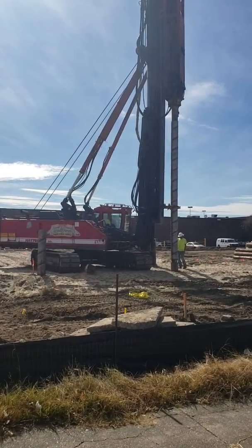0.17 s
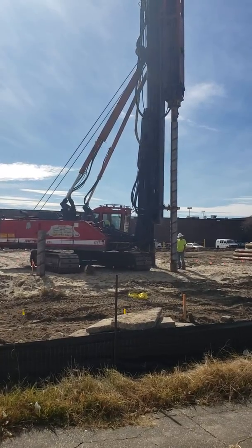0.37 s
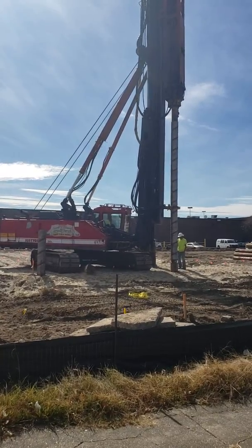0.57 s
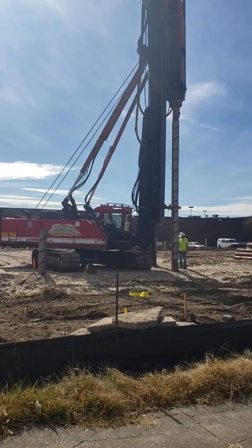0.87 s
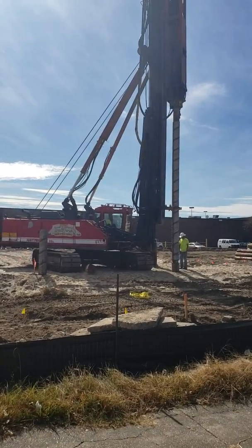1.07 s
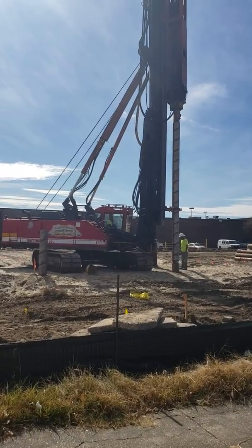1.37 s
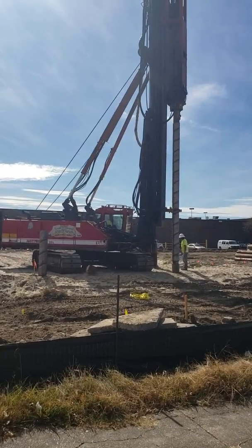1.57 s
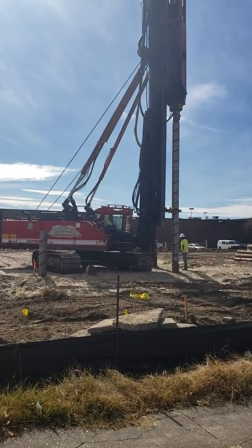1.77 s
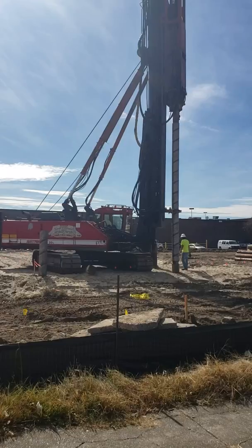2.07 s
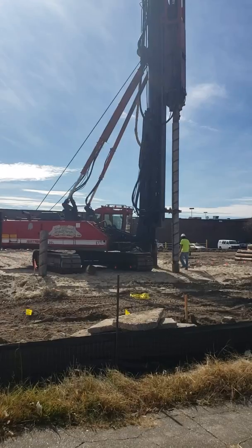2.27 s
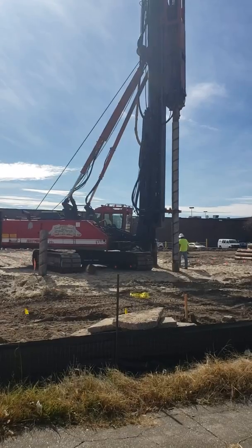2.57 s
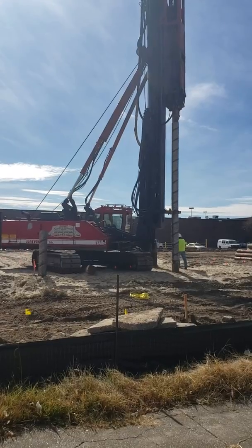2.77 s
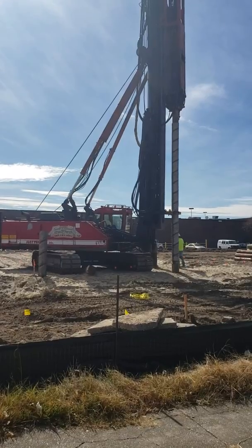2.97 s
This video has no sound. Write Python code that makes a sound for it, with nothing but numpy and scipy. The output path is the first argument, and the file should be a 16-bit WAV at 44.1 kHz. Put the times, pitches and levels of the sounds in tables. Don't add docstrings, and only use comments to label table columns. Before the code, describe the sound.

Steady low engine drone of a drilling rig, with metallic scraping and one clank.

```python
import sys
import numpy as np
from scipy import signal
from scipy.io import wavfile

SR = 44100
rng = np.random.default_rng(int(sys.argv[2]) if len(sys.argv) > 2 else 0)


def digitize_waveform(pressure):
    field = np.atleast_2d(pressure).T
    bounded = np.clip(field, -1, 1)
    quanta = np.round(bounded * 32767).astype(np.int16)
    wavfile.write(sys.argv[1], SR, quanta)


def invert_db(x):
    u = np.asarray(x, float) / 20
    return 10 ** u


N = 138033


def rms_one(x):
    return x / np.sqrt(np.mean(x ** 2) + 1e-20)


def in_time(rows):
    s, *columns = np.transpose(rows)
    return [np.interp(np.arange(N) / SR, s, c) for c in columns]


def at_hz(points, hz):
    points_hz, values = np.transpose(points)
    return np.interp(np.log(hz), np.log(points_hz), values)


def drift(rate_hz):
    r = np.exp(-80 * np.pi * rate_hz / SR)
    slow = signal.lfilter([1], [1, -2 * r, r * r], rng.standard_normal(N // 40 + 2002))
    slow = slow[2000:]
    return np.interp(np.arange(N) / 40, np.arange(len(slow)), rms_one(slow))


def resonate(x, hz, width_hz):
    r = np.exp(-np.pi * width_hz / SR)
    poles = [1, -2 * r * np.cos(2 * np.pi * hz / SR), r * r]
    return signal.lfilter([1, 0, -1], poles, x + 1e-18) * (1 - r * r) / 2


def resonate_twice(x, hz, width_hz):
    return resonate(resonate(x, hz, width_hz), hz, width_hz)


def low_pass(x, order, hz):
    return signal.sosfilt(signal.butter(order, hz, fs=SR, output="sos"), x)


def band_pass(x, low_hz, high_hz):
    return signal.sosfilt(signal.butter(2, [low_hz, high_hz], "band", fs=SR, output="sos"), x)


def spread(pair, hz):
    # pitch_hz, correlation
    likeness = [(60, 1), (400, 0.95), (600, 0.74), (1300, 0.59), (2200, 0.65), (2900, -0.054), (4200, 0.35),
                (15000, -0.025)]
    # pitch_hz, left_minus_right_db
    lean = [(60, -5), (130, 7.5), (290, -3.5), (640, 5), (1410, -3), (2400, 1), (4200, -4), (8000, 2),
            (15000, -5)]
    # pitch_hz, phase_rad
    port_phase = [(0, 0), (950, -0.15), (1460, 0.65), (2410, 0.41), (3400, -0.5), (4820, 0.017),
                  (5770, -0.87), (15300, -0.52)]
    alike = np.clip(at_hz(likeness, hz), -.9, .999)
    sides = np.array([[1], [-1]])
    half = np.interp(hz, *np.transpose(port_phase)) / 2
    ahead = np.gradient(pair[0]) / np.sin(2 * np.pi * hz / SR)
    direct = np.cos(half) * pair[0] + np.sin(half) * ahead * sides
    ports = np.sqrt(1 + alike) * direct + np.sqrt(1 - alike) * pair[1] * sides
    return invert_db(at_hz(lean, hz) / 2 * sides) * ports / np.sqrt(2)


def banded(spectrum, low_hz, count, white, patchy_db):
    out, together = 0, drift(2.0)
    edges = low_hz * 2 ** (np.arange(count + 1) / 3)
    for k, (low, high) in enumerate(zip(edges, edges[1:])):
        pair = band_pass(white[k % 2], low, high)
        hz = np.sqrt(low * high)
        flicker_db = patchy_db * (0.2 * together + drift(5.6))
        out = out + invert_db(at_hz(spectrum, hz) + flicker_db) * spread(pair, hz)
    return rms_one(out)


def wind():
    # peak_s, level_db
    gusts = [(.1, -36), (.42, -54), (.555, -26), (.68, -30), (.78, -31), (.88, -37), (.95, -28),
             (1.12, -43.5), (1.33, -56), (1.535, -28), (1.65, -29), (2.0, -26.5), (2.37, -42), (2.65, -34),
             (2.82, -32), (2.98, -37), (3.11, -34)]
    wind_db, gust_db, gust_s = -40.5, 2.5, .018
    t = np.arange(N) / SR
    high_pass = signal.butter(3, 47, "high", fs=SR, output="sos")
    low = signal.sosfilt(high_pass, rng.standard_normal((2, N)))
    low = low_pass(low, 2, 71.5)
    puffs = sum(invert_db(db) * np.exp(-((t - s) / gust_s) ** 2) for s, db in gusts)
    breeze = invert_db(wind_db + gust_db * np.array([drift(10.0), drift(13.0)]))
    return (breeze + puffs) * rms_one(low) * invert_db(np.array([[1.5], [-1.5]]))


def air_bleed():
    # time_s, level_db, whistle_hz
    bleed = [(0, -59.5, 6170), (.4, -69.5, 6570), (.85, -62.5, 7600), (.95, -65, 7600), (1.3, -84, 7600),
             (3.13, -86, 7600)]
    width_hz, top_hz, top_width_hz, top_db, fizz_db = 1100, 12000, 840, -9.5, -11.5
    db, hz = in_time(bleed)
    base = low_pass(rng.standard_normal((2, 2, N)), 2, width_hz / 2)
    angle = 2 * np.pi * np.cumsum(hz) / SR
    whistle = rms_one(base[0] * np.cos(angle) + base[1] * np.sin(angle))
    top = rms_one(resonate_twice(rng.standard_normal((2, N)), top_hz, top_width_hz))
    fizz = rms_one(np.diff(rng.standard_normal((2, N + 4)), 4))
    return invert_db(db) * (whistle + invert_db(top_db) * top + invert_db(fizz_db) * fizz)


def roar(turns):
    # pitch_hz, level_db_per_hz
    rumble_spectrum = [(20, -28.5), (42, -11.5), (75, 1.5), (125, -2.5), (180, -6), (270, -9.5),
                       (400, -10.5), (540, -28)]
    # pitch_hz, level_db_per_hz
    casing_spectrum = [(280, -37), (480, -7), (509, -16), (711, 0.5), (1080, -3.5), (2030, -17),
                       (2560, -24.5), (3330, -14.5), (15600, -41.5)]
    # time_s, rumble_db, casing_db, treble_db
    load = [(0, -1, -0.5, -0.5), (.4, -4, -0.5, 1), (.8, -2, 1, 2), (1.05, -2, 1, -0.5),
            (1.4, -1.5, 1, -3.5), (1.6, 0.5, 1, -0.5), (1.9, -3, 0, -3), (2.3, 0.5, 2.5, 0.5),
            (2.55, 1, 1.5, -1), (2.85, 2, 1.5, 1), (3.13, 1.5, 3, 1.5)]
    # pitch_hz, width_hz, level_db
    casing = [(702, 120, -56), (1254, 308, -52.5), (2040, 367, -55), (3930, 880, -60.5), (7600, 400, -68.5)]
    low_db, high_db, treble_from_hz, firing_gate = -32, -41, 2900, .1
    rumble_db, casing_db, treble_db = in_time(load)
    low_white = rng.standard_normal((2, 2, N))
    low = invert_db(low_db) * banded(rumble_spectrum, 20.48, 14, low_white, patchy_db=-0.8)
    white = rng.standard_normal((2, 2, N))
    high = invert_db(high_db) * banded(casing_spectrum, 499.4, 15, white, patchy_db=0.87)
    for hz, width_hz, db in casing:
        ring = rms_one(resonate_twice(white[0], hz, width_hz))
        high = high + invert_db(db + 1.1 * drift(10.0)) * spread(ring, hz) * np.sqrt(2)
    dull = signal.sosfiltfilt(signal.butter(2, treble_from_hz, fs=SR, output="sos"), high)
    treble = (high - dull) * (1 + firing_gate * np.cos(2 * np.pi * turns))
    return invert_db(rumble_db) * low + invert_db(casing_db) * dull + invert_db(treble_db) * treble


def groans():
    # start_s, length_s, pitch_hz, level_db
    moans = [
        (.435, .05, 735, -43),
        (.50, .11, 612, -40),
        (.695, .05, 615, -43),
        (.70, .05, 780, -46),
        (.65, .09, 1960, -52),
        (.74, .07, 1900, -54),
    ]
    sag = .3
    t, out = np.arange(N) / SR, 0
    for s, length, hz, db in moans:
        u = np.clip((t - s) / length, 0, 1)
        pitch = hz * (1 + sag * (u - .45) ** 2)
        swell = np.sin(np.pi * u) ** .6
        out = out + invert_db(db + 3) * swell * np.sin(2 * np.pi * np.cumsum(pitch) / SR)
    return out * invert_db(np.array([[2.5], [-2.5]]))


def clank():
    # time_s, peak_db
    strikes = [
        (1.5172, -30),
        (1.561, -30),
    ]
    # pitch_hz, blow_db, echo_db, t60_s
    modes = [(600, -6, -16, .14), (868, -14, -2, .25), (945, 2, -14, .07), (1110, -6, -12, .03),
             (1815, -20, -15, .25), (2050, -17, -20, .1), (2290, -18, -20, .12), (2510, -5, -22, .05),
             (2720, -17, -24, .1), (3450, -8, -40, .025), (3900, -15, -40, .012), (4650, -9, -40, .03),
             (4900, -13, -40, .018)]
    contact_hz, tick_s, tick_db = 5600, 3.042, -53
    crack_db, crack_s, tail_db, tail_s, crack_top_hz = -34, .002, -31.5, .055, 2800
    out, t = np.zeros((2, N)), np.arange(N) / SR
    for hz, *strikes_db, t60 in modes:
        clicks = np.zeros((2, N))
        for (s, peak_db), db in zip(strikes, strikes_db):
            uneven_db = 2 * rng.standard_normal() * np.array([1, -1])
            clicks[:, int(s * SR)] = invert_db(peak_db + db + uneven_db)
        r, w = invert_db(-60 / (t60 * SR)), 2 * np.pi * hz / SR
        out += signal.lfilter([0, np.sin(w)], [1, -2 * r * np.cos(w), r * r], clicks + 1e-18)
    out = low_pass(out, 4, contact_hz)
    since = np.maximum(t - strikes[0][0], 0)
    tick = np.maximum(t - tick_s, 0)
    noise = rng.standard_normal((3, N))
    noise = noise[0] + 0.88 * noise[1:]
    crack = invert_db(crack_db) * np.exp(-since / crack_s)
    tail = invert_db(tail_db) * np.exp(-since / tail_s)
    burst = signal.lfilter([.5], [1, -.5], noise * (since > 0) * (crack + tail))
    out += band_pass(burst, 1500, crack_top_hz)
    return out + invert_db(tick_db) * (tick > 0) * np.exp(-tick / .002) * resonate(noise, 11000, 5000)


def pump():
    # time_s, pitch_hz, level_db
    whine = [(0, 286, -75), (2.45, 286, -62), (2.58, 290, -45), (2.75, 301, -44), (2.9, 304, -44),
             (3.13, 306, -41)]
    hz, db = in_time(whine)
    return np.sqrt(2) * invert_db(db) * np.sin(2 * np.pi * np.cumsum(hz) / SR)


def catches():
    # time_s, peak_db, ring_hz
    snags = [(.476, -45, 3370), (.510, -43, 3300), (.565, -42, 3400), (.595, -46, 3400), (.670, -46, 3350),
             (.689, -43, 3350), (.736, -48, 3380), (.869, -44, 3340), (.926, -47, 3330), (.991, -44, 3380),
             (1.039, -47, 3400), (1.057, -48, 3390), (1.096, -48, 3420), (1.874, -44, 3380),
             (1.976, -47, 3420), (1.994, -45, 3420), (2.088, -45, 3420), (2.1265, -42, 3420),
             (2.144, -40, 3430), (2.154, -43, 3420), (2.164, -41, 3420), (2.173, -38, 3400),
             (2.184, -44, 3420), (2.2013, -39, 3430), (2.211, -42, 3420), (2.221, -44, 3400),
             (2.230, -44, 3400), (2.239, -37, 3410), (2.258, -41, 3420), (2.269, -42, 3420),
             (2.277, -41, 3420), (2.2846, -36, 3430), (2.293, -42, 3420), (2.304, -40, 3420),
             (2.312, -34, 3410), (2.329, -42, 3400), (2.341, -34, 3400), (2.348, -38, 3430),
             (2.359, -42, 3420), (2.379, -41, 3400), (2.395, -45, 3400), (2.624, -45, 3370),
             (2.931, -45, 3420), (2.943, -45, 3420), (2.957, -43, 3420), (3.028, -42, 3410),
             (3.0454, -38, 3420), (3.062, -44, 3420), (3.072, -42, 3480), (3.088, -44, 3450)]
    # time_s, peak_db, ring_hz
    ticks = [(2.2865, -50, 8800), (2.287, -54, 10200), (2.288, -49, 7600), (2.298, -48, 7600),
             (2.312, -42, 5450), (2.313, -47, 7700), (2.335, -42, 4300), (2.352, -39, 4200),
             (2.359, -42, 4600), (2.372, -43, 4300), (2.374, -49, 7500)]
    catch_db, width_share, lean_db = -3.5, .045, -3.0
    out, click = np.zeros(N + SR), np.zeros(2000)
    click[0] = 1
    for s, db, hz in snags + ticks:
        ring = resonate_twice(click, hz, width_share * hz)
        out[int(s * SR):][:len(ring)] += invert_db(db + catch_db) * ring / np.abs(ring).max()
    return out[:N] * invert_db(lean_db / 2 * np.array([[1], [-1]]))


def grinding(turns):
    # time_s, squeal_db, scrape_db
    grind = [(0, -64.5, -67.5), (.4, -58, -60.5), (.7, -56, -63), (.85, -59.5, -61.5), (1.2, -59.5, -72.5),
             (1.45, -70, -81), (1.58, -56, -60), (1.75, -59, -70), (1.9, -54, -68), (2.15, -52, -62),
             (2.26, -50, -52), (2.31, -49, -49.5), (2.36, -49, -51), (2.43, -60, -64), (2.7, -58, -64.5),
             (2.9, -55, -60.5), (3.05, -49, -56), (3.13, -56, -64)]
    # pitch_hz, width_hz, level_db
    steel = [(4310, 890, -0.5), (5440, 680, -8), (7600, 700, -9.5), (9200, 1000, -18.5), (12300, 2700, -17)]
    grains_per_s, size_spread_db, judder_hz = 12000, 1.0, 28
    squeal_hz, squeal_width_hz, squeal_bed_db = 3420, 130, -5.0
    squeal_db, scrape_db = in_time(grind)
    shake = (1 + .35 * np.cos(2 * np.pi * turns)) * invert_db(1.8 * drift(judder_hz))
    sizes = invert_db(size_spread_db * rng.exponential(1, (2, N))) * rng.choice([-1, 1], (2, N))
    grains = sizes * (rng.random((2, N)) < grains_per_s / SR) * shake

    def ring(hz, width_hz):
        return spread(rms_one(resonate_twice(grains, hz, width_hz)), hz)

    squeal = ring(squeal_hz, squeal_width_hz)
    squeal = squeal.mean(axis=0) * invert_db(np.array([[-1], [1]])) + .35 * squeal
    scrape = sum(ring(hz, width_hz) * invert_db(db) for hz, width_hz, db in steel)
    scrape_level = invert_db(scrape_db + 2.0 * drift(judder_hz))
    return invert_db(squeal_db + squeal_bed_db) * squeal + scrape_level * scrape


def engine():
    # time_s, firing_hz, drone_db
    governor = [(0, 108.2, -21), (.2, 107.8, -19), (.55, 107.5, -19), (.7, 106.3, -16), (1.0, 106.2, -16),
                (1.25, 106.9, -17), (1.4, 106.7, -17), (1.9, 106.8, -17.5), (2.2, 106.9, -16.5),
                (2.45, 106.4, -16.5), (2.7, 106.5, -15), (2.88, 106.8, -17), (3.0, 106.5, -14.5),
                (3.13, 106.5, -17.5)]
    orders = [3, 12, 13.07, 16, 18, 19, 22, 26.04, 34, 36, 39.2, 42.2, 70, 74, 112, 126]
    order_db = [-49.5, -65.5, -43, -41.5, -36.5, -63.5, -54.5, -54, -60, -69.5, -66, -60, -66, -62, -62,
                -60.5]
    # time_s, level_db
    mesh = [(0, 1), (.6, -3), (.8, 2.5), (1.5, 1.5), (1.9, -2.5), (3.13, -1)]
    firings_per_cycle, mesh_from_order = 6, 100
    drone_lag_s, order_lag_s = .00024, .00002
    drone_waver_db, order_waver_db, order_swell_db = 0.45, .7, 2.0
    hz, db = in_time(governor)
    mesh_db = in_time(mesh)[0]
    left = np.array([[1], [0]]) * hz
    turns = np.cumsum(hz) / SR - order_lag_s * left
    drone_level = invert_db(db + drone_waver_db * drift(8.1))
    out = drone_level * np.cos(2 * np.pi * (turns - drone_lag_s * left))
    swell_db = order_swell_db * (np.arange(N) / N - .5)
    for order, level_db in zip(orders, order_db):
        waver_db = order_waver_db * drift(2.4) * np.clip((-26.5 - level_db) / 15, .2, 1.2)
        level = invert_db(level_db + waver_db + swell_db + (order > mesh_from_order) * mesh_db)
        out = out + level * np.cos(2 * np.pi * turns * order / firings_per_cycle)
    return np.sqrt(2) * out, turns[1]


def scene():
    drone, turns = engine()
    site = wind() + air_bleed() + roar(turns)
    steel = groans() + clank() + catches() + grinding(turns)
    return site + steel + pump() + drone


def top_cut(x):
    return signal.sosfilt(signal.butter(12, 15740, fs=SR, output="sos"), x)


def record(dry):
    return top_cut(dry)


dry = scene()
out = record(dry)
digitize_waveform(out)
```